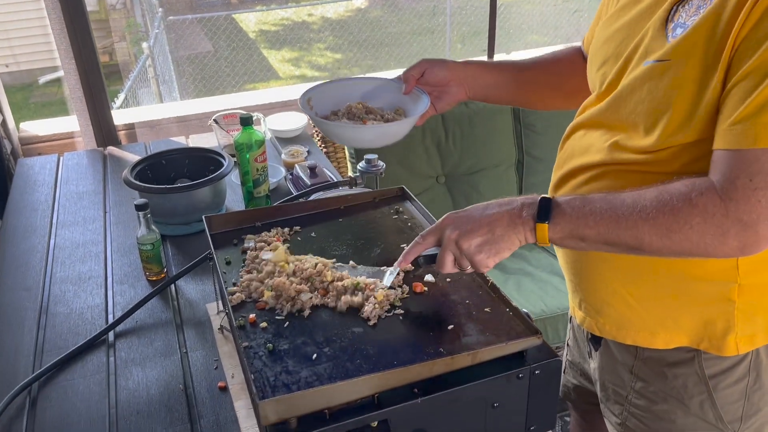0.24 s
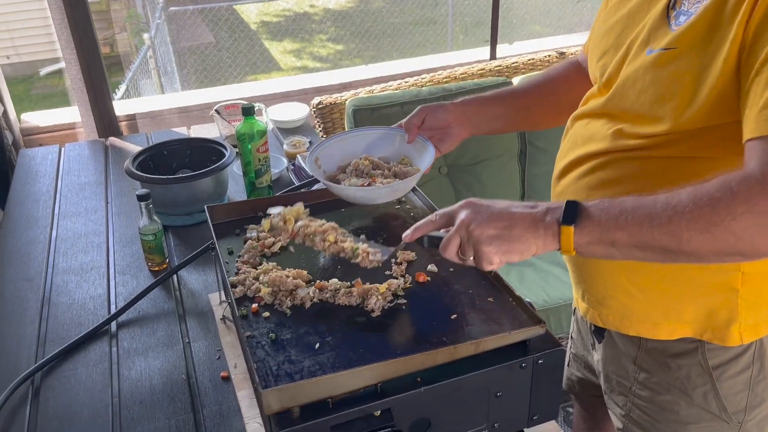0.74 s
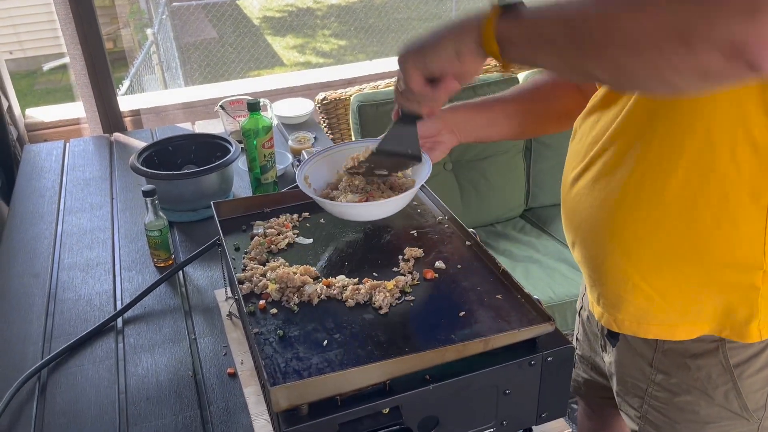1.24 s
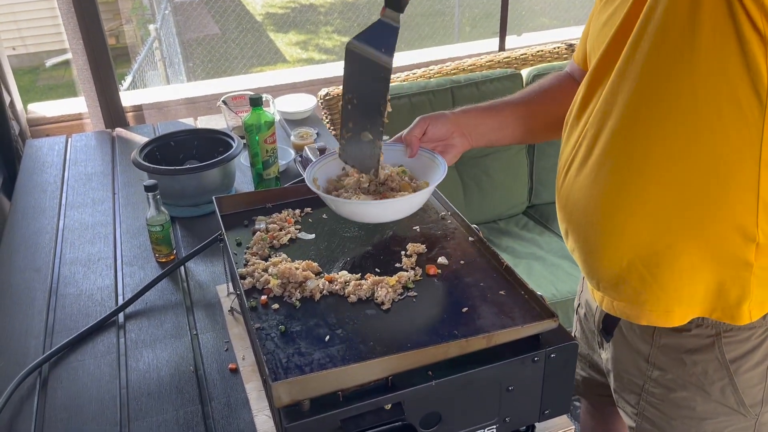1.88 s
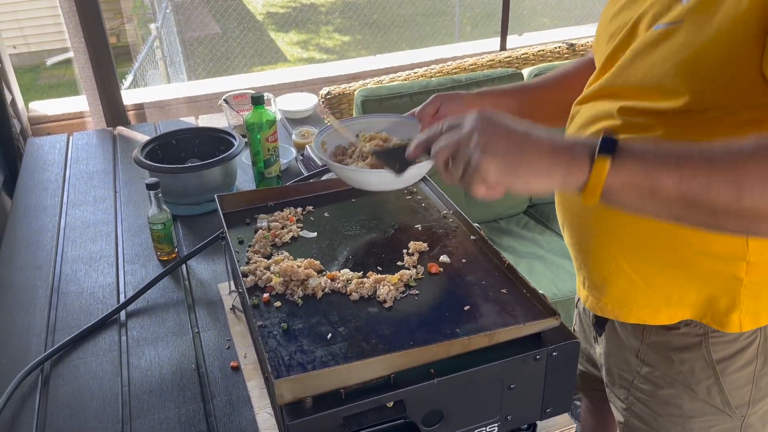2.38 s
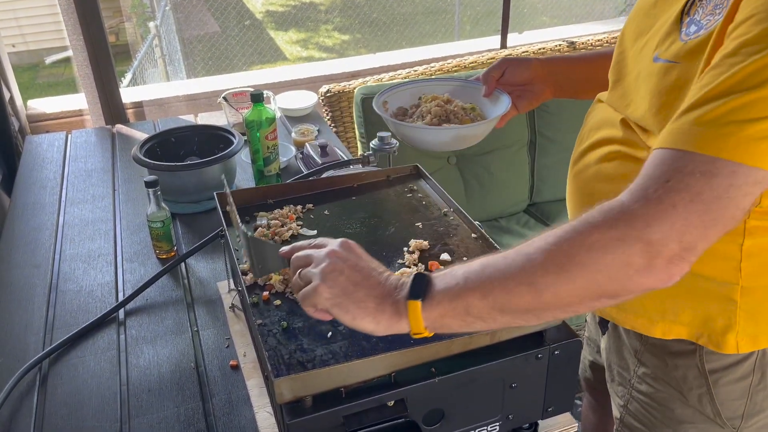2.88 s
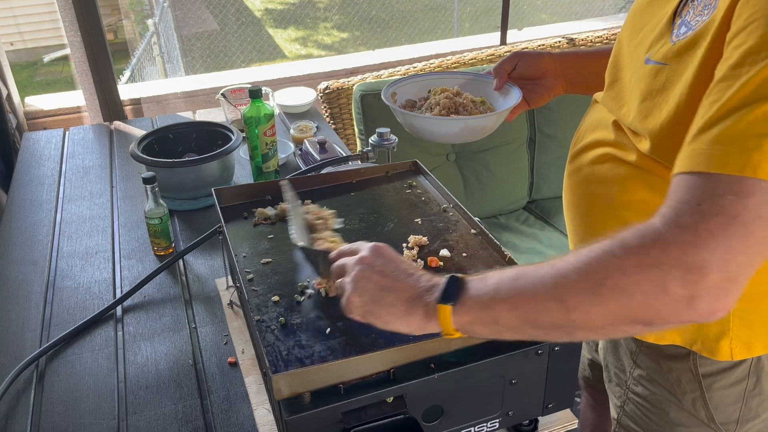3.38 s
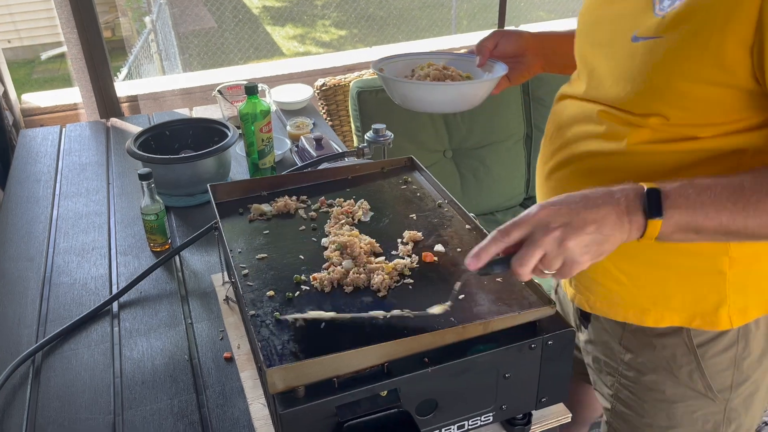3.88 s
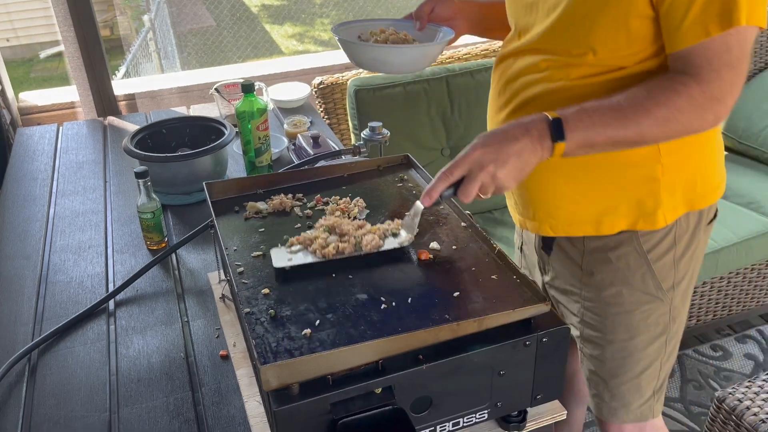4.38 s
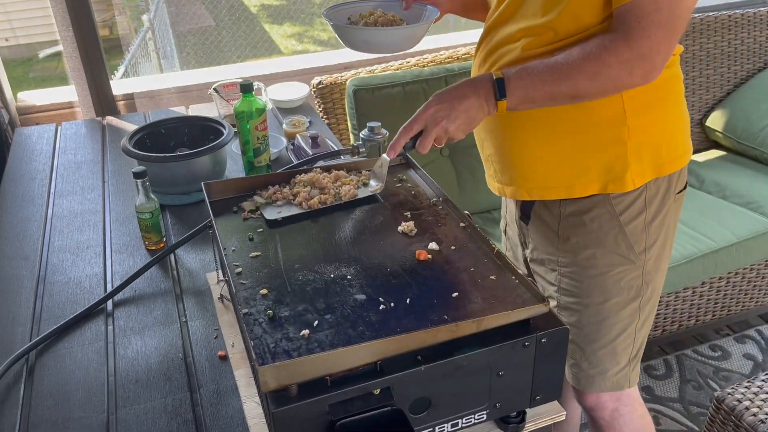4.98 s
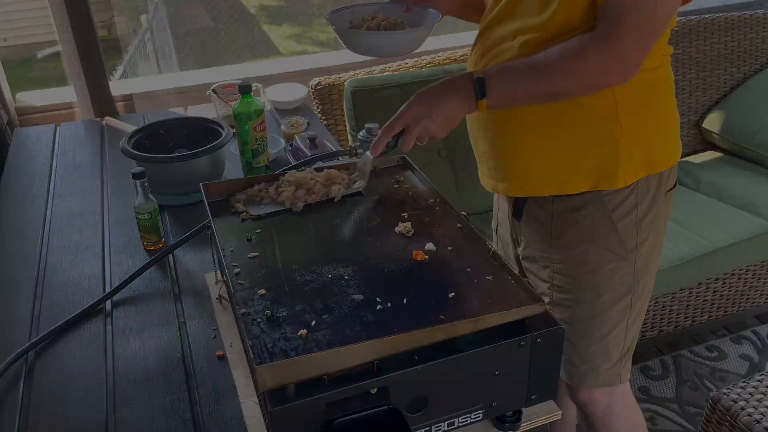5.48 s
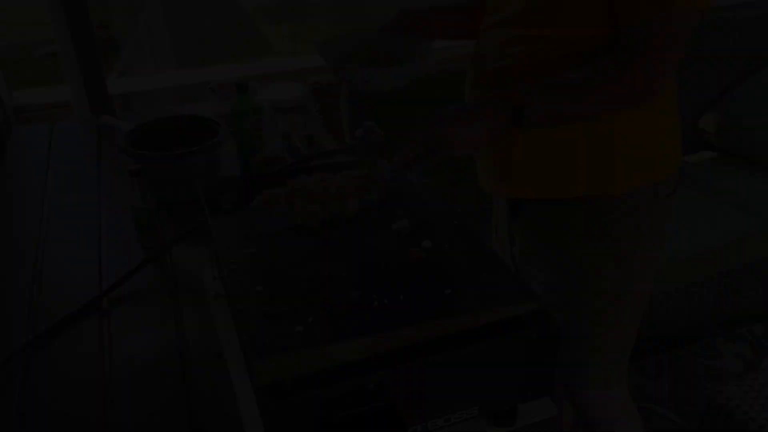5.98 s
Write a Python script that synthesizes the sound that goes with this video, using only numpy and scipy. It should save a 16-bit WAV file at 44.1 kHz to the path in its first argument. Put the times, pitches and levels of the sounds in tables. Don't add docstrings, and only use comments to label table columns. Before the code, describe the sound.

From 0 to 6.2 s a distant small engine drones at a low, slightly wavering pitch under a soft wash of outdoor air, with a very faint ticking insect and a high pulsing cricket. Fine fizz and sparse, tiny crisp pops come from hot rice, slightly clearer around 1.5 and 2.4 s. A faint scrape and rice shove occurs at 0.25 s; thin high bird notes come between 0.3 and 1.6 s. At 3.06 s the spatula hits the griddle hard: a loud, rattling steel clank with a short ring and porch echo. A lighter, brighter clink follows at 3.9 s, then a ringing, hissing scrape at 4.1-4.35 s. Soft rubbing strokes come at 4.4-4.7 s and from 5 s, with a dull rice push at 5.45 s and sharper pops near 5.0 and 5.7 s. Dropping bird whistles sound at 5.65 and 6.0 s as the background fades slightly.

```python
import sys
import numpy as np
from scipy import signal
from scipy.fft import rfft, irfft, next_fast_len
from scipy.io import wavfile
from scipy.ndimage import uniform_filter1d

SR = 44100
rng = np.random.default_rng(int(sys.argv[2]) if len(sys.argv) > 2 else 0)


def unload_audio(sound):
    columns = np.transpose(np.atleast_2d(sound))
    steps = np.round(np.clip(columns, -1, 1) * 32767)
    wavfile.write(sys.argv[1], SR, steps.astype(np.int16))


def gain_from_decibels(decibels):
    exponent = np.asarray(decibels, float) / 20
    return 10 ** exponent


N = 275172
T = np.arange(N) / SR
FADE_DB = -5 * np.maximum(T - 5.36, 0)


def evened(x):
    return x / np.sqrt(np.mean(x ** 2) + 1e-20)


def read(points, hz):
    f, value = np.transpose(points)
    return np.interp(np.log(hz + 1), np.log(f + 1), value)


def coloured(x, points):
    size = x.shape[-1]
    gain = gain_from_decibels(read(points, np.fft.rfftfreq(size, 1 / SR)))
    return irfft(rfft(x) * gain, size)


def add(mix, s, sound):
    part = mix[:, round(s * SR):][:, :sound.shape[-1]]
    part += sound[..., :part.shape[1]]


def resonate(x, hz, width):
    turn = np.exp(2j * np.pi * np.cumsum(hz * np.ones(x.shape[-1])) / SR)
    r = np.exp(-np.pi * width / SR)
    smooth = signal.lfilter([1 - r], [1, -r], x / turn + 1e-18)
    return 2 * (turn * smooth).real


def drift(size, shape):
    return evened(uniform_filter1d(uniform_filter1d(rng.standard_normal(shape), size), size))


def blow(db, rattle, rise, longest, modes, crack):
    t = np.arange(SR // 3) / SR
    clicks = rng.standard_normal((2, len(t))) * gain_from_decibels(2.2 * drift(size=30, shape=len(t)))
    burst = np.exp(-(t / rattle) ** 2) * np.minimum(t / 0.0008, 1)
    late_rattle = 0.21 * np.exp(-t / 0.055) * np.minimum(t / 0.0091, 1)
    body = gain_from_decibels(-18) * (burst + late_rattle) * evened(coloured(clicks, crack))

    f, mode_db, t60 = np.transpose(modes)[:, :, None]
    turn = rng.random((len(modes), 1)) + np.array([0, .75])[:, None, None]
    flutter_db = 1.1 * drift(size=300, shape=(len(modes), len(t)))
    decay_db = -60 * (t - .016) / np.clip(t60, .08, longest)
    heights = gain_from_decibels(mode_db + flutter_db + decay_db) * (1 - np.exp(-t / rise))
    ring = (heights * np.sin(2 * np.pi * (f * t + turn))).sum(1)
    ring = ring / abs(ring).max()
    return gain_from_decibels(db) * (ring + body + gain_from_decibels(-8) * porch(body + .25 * ring))


def blows():
    times = [
        3.0594,
        3.9004,
    ]
    # level/dB, rattle length/s, ring rise/s, longest t60/s
    landings = [
        (-6.5, 0.031, 0.0025, 0.27),
        (-19.5, 0.02, 0.0048, 0.25),
    ]
    # f/Hz, level/dB, t60/s
    plate = [(557, -15, 0.25), (711, -13, 0.4), (845, -4, 0.18), (991, -11, 0.24), (1160, -6, 0.4),
             (1370, -9, 0.32), (1467, -9, 0.15), (1628, -15, 0.16), (1938, -7, 0.2), (2073, -10, 0.4),
             (2202, -13, 0.13), (2280, -10, 0.15), (2355, -14, 0.13), (2484, 0, 0.12), (2597, -7, 0.32),
             (2670, -10, 0.27), (2780, -8, 0.2), (2961, -1, 0.13), (3058, -6, 0.2), (3168, -5, 0.08),
             (3451, -1, 0.19), (3537, -2, 0.12), (3636, -6, 0.1), (3712, -9, 0.12), (3801, -10, 0.37),
             (3876, -11, 0.18), (3973, -6, 0.08), (4121, 0, 0.07), (4535, -1, 0.12), (4737, -11, 0.25),
             (4823, -3, 0.11), (4893, -13, 0.11), (5165, -13, 0.2), (5356, -16, 0.09), (5424, -9, 0.13),
             (5655, -7, 0.13), (5873, -17, 0.07), (6379, -18, 0.09), (6503, -17, 0.16), (7354, -21, 0.12)]
    # f/Hz, level/dB, t60/s
    blade = [(589, -7, 0.08), (778, 0, 0.4), (1144, -8, 0.23), (1332, -8, 0.15), (1502, -10, 0.4),
             (1814, -3, 0.11), (1930, -11, 0.4), (2089, -11, 0.4), (2218, -10, 0.11), (2309, -7, 0.09),
             (2670, -7, 0.13), (2888, -12, 0.14), (3550, -10, 0.07), (3908, -11, 0.07), (4126, -10, 0.21),
             (4221, -11, 0.11), (4538, -6, 0.22), (4756, -7, 0.16), (5168, -14, 0.18), (5636, -14, 0.15),
             (6576, -16, 0.08), (6807, -15, 0.13), (7265, -15, 0.15), (7561, -12, 0.08), (7913, -18, 0.14),
             (7992, -10, 0.14), (8473, -12, 0.12), (8761, -19, 0.16), (8891, -23, 0.09), (9550, -19, 0.1),
             (9709, -18, 0.2), (10094, -15, 0.21), (10565, -18, 0.31), (11181, -23, 0.06),
             (11948, -20, 0.08), (12037, -16, 0.11), (12212, -27, 0.2), (12723, -22, 0.16),
             (13644, -21, 0.07), (14193, -27, 0.13)]
    # f/Hz, level/dB, t60/s
    frame = [(246, -25, .15), (307, -14, .2), (367, -15.5, 0.23), (453, -23, 0.25)]
    # f/Hz, level/dB
    cracks = [
        [(200, -34), (500, -17), (1100, -8), (1800, -8), (3200, 0), (5400, -4), (7000, -10), (9000, -9),
         (10500, -10), (11700, -24), (13500, -19), (15500, -30)],
        [(200, -36), (450, -10), (750, 0), (1900, 0), (2900, -8), (4000, 0), (5400, -3), (7500, -1), (9500, -3),
         (12000, -6), (15500, -12)],
    ]
    out = np.zeros((2, N))
    for s, row, modes, crack in zip(times, landings, (plate + frame, blade + frame), cracks):
        add(out, s, blow(*row, modes, crack))
    return out


def tick(db, top_hz):
    t = np.arange(300) / SR
    snap = rng.standard_normal((2, len(t))) * np.exp(-t / 0.00067)
    lowpass = signal.butter(N=3, Wn=min(top_hz, 16000), fs=SR, output="sos")
    return gain_from_decibels(db) * signal.sosfilt(lowpass, snap)


def ticks():
    # t/s, level/dB, brightest f/Hz
    contacts = [(3.059, -13.5, 7000), (3.0627, -16, 5000), (3.0645, -22, 5000), (3.0689, -14, 5000),
                (3.0738, -16, 4500), (3.082, -14, 4000), (3.8996, -24, 14000), (3.9048, -12, 9000),
                (3.9073, -18, 14000), (3.908, -22, 9000), (3.914, -25, 6000), (3.9224, -17, 4000),
                (4.092, -36, 14000), (4.103, -33, 14000), (5.44, -42, 3000), (5.506, -43, 3500),
                (.257, -45, 3500)]
    out = np.zeros((2, N))
    for s, *row in contacts:
        add(out, s, tick(*row))
    return out


def stroke(t, ring_db, hiss_db, tilt_db, damping, bare=False):
    # early f/Hz, late f/Hz, width/Hz, level/dB, best driven t/s
    flex = [(777, 850, 35, -3, 4.29), (1176, 1160, 33, -1, 4.19), (1697, 1805, 18, 0.5, 4.21),
            (2100, 2256, 50, 1, 4.19), (2320, 2385, 45, -3, 4.29), (2775, 2800, 56, 0, 4.26),
            (2990, 2960, 19, -4, 4.14), (3020, 3052, 49, -6, 4.13), (3203, 4800, 32, -12, 4.4),
            (3440, 3380, 45, -5, 4.25), (3450, 3550, 24, 1.5, 4.25), (3770, 3900, 42, -9, 4.3),
            (4105, 3975, 28, 2.5, 4.18), (4350, 6500, 35, -8, 4.26), (4412, 4400, 32, -13, 4.19),
            (4600, 4535, 37, -5, 4.26), (4920, 4745, 44, -7, 4.3), (5210, 5130, 40, -2.5, 4.27),
            (5320, 5170, 30, -8, 4.24), (5250, 5272, 23, 0, 4.21), (5430, 5380, 35, -16, 4.13),
            (5500, 6400, 47, -7, 4.29), (5820, 5850, 30, -6, 4.6), (6140, 8800, 47, -4, 4.23),
            (6700, 9100, 30, -8, 4.22), (6260, 7400, 50, -4.5, 4.3), (7000, 7200, 23, -19, 4.2),
            (7380, 7362, 68, -7, 4.3)]
    # f/Hz, width/Hz, level/dB
    rub = [(1600, 28, -7), (1930, 87, 0), (2130, 53, 1), (2490, 65, 2), (3390, 26, 1.5), (3906, 80, -7),
           (4409, 77, -6.5), (5030, 44, -5.5), (5297, 29, -5), (5658, 80, -31), (6240, 70, -24),
           (6770, 79, -8), (7670, 70, 1.5)]
    # f/Hz, level/dB
    hiss_colour = [(800, -24), (1500, -13), (5400, -7), (8000, -4), (9300, 3), (10500, -4), (12000, -6),
                   (13800, -2), (15500, -11)]
    # f/Hz, level/dB
    rasp_colour = [(400, -21), (750, -7), (1400, -9), (2200, 1), (5400, -6), (7500, -9), (9000, -35)]
    late = (t - t[0]) / (t[-1] - t[0])
    modes = flex if bare else [(f, f, w, db, None) for f, w, db in rub]
    roughness_db = 1.8 if bare else 2.6
    slips = rng.standard_normal((2, len(t))) * gain_from_decibels(roughness_db * drift(size=120, shape=len(t)))
    ring = 0
    for early_hz, late_hz, w, db, best in modes:
        bend = 1 + 0.004 * drift(size=1200, shape=len(t))
        hz = (early_hz + (late_hz - early_hz) * late) * bend
        loss_db = 55 * abs(t - best) if bare else 0
        tilted_db = db - loss_db + tilt_db * np.log2(early_hz / 3000)
        level_db = tilted_db + 2.7 * drift(size=600, shape=len(t))
        mode = resonate(resonate(slips, hz, w * damping), late_hz, 49.0 * w)
        ring = ring + gain_from_decibels(level_db) * evened(mode)
    rasp = gain_from_decibels(-10) * evened(coloured(slips, rasp_colour))
    hiss = gain_from_decibels(hiss_db + 1.5) * evened(coloured(slips, hiss_colour))
    sound = gain_from_decibels(ring_db + 1.5) * (evened(ring) + rasp) + hiss
    return t[0], sound * signal.windows.tukey(len(t), .05)


def scrape():
    # t/s, level/dB
    pressure = [
        (4.087, -52),
        (4.094, -39),
        (4.103, -38.5),
        (4.195, -32),
        (4.227, -35.5),
        (4.291, -33.5),
        (4.313, -37),
        (4.35, -56),
        (4.4, -54),
    ]
    s, pressure_db = np.transpose(pressure)
    t = np.arange(s[0], s[-1], 1 / SR)
    ring_db = np.interp(t, s, pressure_db) - 2.1
    fastest_s, hiss_loss_db_per_s = 4.185, 44
    hiss_db = ring_db + 5.5 - hiss_loss_db_per_s * abs(t - fastest_s)
    return stroke(t, ring_db, hiss_db, tilt_db=1.75, damping=0.83, bare=True)


def nudge(s, rise, fall, ring_db, hiss_db):
    t = np.arange(s - rise, s + fall, 1 / SR)
    slack = np.where(t < s, (s - t) / rise, (t - s) / fall)
    firm_tilt_db, edge_tilt_db, edge_db = 1.5, 2.5, -13.5
    tilt_db = firm_tilt_db + (edge_tilt_db - firm_tilt_db) * slack
    free_db = -30
    damping = np.clip(gain_from_decibels(0.69 * (free_db - ring_db)), 1, 10)
    return stroke(t, ring_db + edge_db * slack, hiss_db + edge_db * slack, tilt_db, damping)


def heap(s, length, thud_db, patter_db):
    t = np.arange(0, length, 1 / SR)
    lumps = rng.standard_normal((2, len(t))) * gain_from_decibels(2.0 * drift(size=200, shape=len(t)))
    thud = evened(resonate(lumps, 614, 130) + .5 * resonate(lumps, 940, 190))
    patter = evened(resonate(lumps, 1870, 500) + 0.22 * resonate(lumps, 3000, 400))
    shape = np.minimum(t / 0.0024, 1) * gain_from_decibels(-18 * (t / length) ** 4.4)
    return s, shape * (gain_from_decibels(thud_db) * thud + gain_from_decibels(patter_db - 11.0) * patter)


def rubs():
    # firmest t/s, rise/s, fall/s, ringing level/dB, hiss level/dB
    strokes = [(0.225, 0.03, 0.023, -60, -55.5), (3.165, .006, 0.037, -66, -75),
               (3.369, 0.35, 0.06, -76, -65), (4.44, 0.062, 0.086, -56, -56.5),
               (4.505, 0.052, 0.076, -48.5, -50.5), (4.69, 0.057, .03, -66, -62),
               (4.956, 0.22, 0.12, -63, -63), (5.05, 0.17, 0.083, -90, -65), (5.23, 0.13, 0.1, -61, -63.5),
               (5.445, 0.0072, 0.16, -61.5, -69), (5.54, .1, 0.13, -74, -60),
               (5.718, 0.16, 0.064, -87, -59)]
    # start t/s, length/s, thud level/dB, patter level/dB
    heaps = [
        (0.252, .045, -53, -44.5),
        (5.44, 0.17, -52, -55),
        (5.436, 0.024, -66, -43),
        (5.499, 0.061, -62, -46),
    ]
    out = np.zeros((2, N))
    add(out, *scrape())
    for row in strokes:
        add(out, *nudge(*row))
    for row in heaps:
        add(out, *heap(*row))
    return out


def pop(db, hz):
    t = np.arange(900) / SR
    turn = np.array([[0], [np.pi / 2]])
    burst = np.sin(2 * np.pi * hz * t + turn) * np.exp(-t / .00009) * np.minimum(t * SR / 3, 1)
    thump = 0.29 * np.sin(2 * np.pi * 4500 * t) * np.exp(-t / 0.0001)
    spit = 0.059 * np.diff(rng.standard_normal((2, len(t) + 1))) * np.exp(-t / 0.0042)
    return gain_from_decibels(db + 26.5) * (burst + thump + spit)


def rice_pops():
    # t/s, peak level/dB, f/Hz
    grains = [(0.0184, -53.5, 12100), (0.5541, -62, 9690), (0.5658, -58, 11900), (0.7767, -59, 11000),
              (0.8764, -59, 9290), (1.2006, -60, 11200), (1.53, -53, 9300), (1.5378, -53, 12100),
              (1.574, -59, 11500), (1.6402, -61, 11740), (2.2025, -54.5, 12900), (2.239, -57, 11690),
              (2.359, -49.5, 11500), (2.4087, -53, 12900), (2.9647, -62, 10000), (3.2207, -60, 12900),
              (3.2905, -60, 11900), (5.0173, -46.5, 11900), (5.0453, -50, 12000), (5.233, -53.5, 12400),
              (5.3445, -59, 10600), (5.38, -59, 11600), (5.47, -53, 11200), (5.706, -53, 11400),
              (5.719, -47, 11400), (5.7482, -54, 12000), (.7183, -60, 11440), (6.009, -53, 11600),
              (6.121, -60, 10700), (6.1402, -61, 9670), (.0952, -68, 11400), (.2024, -64, 10900),
              (.4279, -61, 10900), (.4928, -62, 11500), (.5896, -60, 9750), (1.4701, -69, 12000),
              (1.6931, -64, 12500), (1.707, -64, 12100), (2.031, -60, 13200), (2.0742, -61, 11800),
              (2.1331, -61, 13100), (2.251, -62, 12000), (3.2106, -65, 12500), (3.235, -57, 11600),
              (4.8264, -70, 12600), (4.8614, -64, 9610), (4.9257, -62, 12200), (5.45, -60, 12200),
              (5.8331, -62, 11100), (5.8623, -63, 11800), (5.8855, -65, 12300)]
    delay_s = 0.0019
    out = np.zeros((2, N))
    for s, *row in grains:
        add(out, s + delay_s, pop(*row))
    return out


def fizz():
    size = gain_from_decibels(3.5 * np.minimum(rng.exponential(1, N), 4)) * (rng.random(N) < 30 / SR)
    return gain_from_decibels(-81) * evened(signal.oaconvolve(size[None], pop(0, 9200), axes=1)[:, :N])


def porch(x):
    # f/Hz, t60/s
    decay = [(300, 0.56), (1000, 0.3), (3000, 0.14), (6000, 0.086), (12000, 0.064)]
    taps = np.zeros((2, SR // 2))
    at = np.arange(200, SR // 2 - 20, 20) + rng.integers(0, 20, (2, (SR // 2 - 201) // 20))
    np.put_along_axis(taps, at, rng.choice([-1., 1.], at.shape), 1)
    hz, t, z = signal.stft(taps, SR, nperseg=256)
    tail = signal.istft(z * gain_from_decibels(-60 * t / read(decay, hz)[:, None]), SR, nperseg=256)[1]
    return signal.fftconvolve(x, tail / np.linalg.norm(tail[0]), axes=1)[:, :x.shape[1]]


def engine():
    # t/s, fourth order f/Hz, fourth order level/dB
    speed = [(0, 97.5, -40.5), (.25, 96.8, -37.5), (.62, 100.3, -40.5), (1.55, 100.3, -40.5),
             (1.8, 96.6, -41), (2.15, 96.8, -41), (2.38, 99.7, -42), (3.0, 99.6, -39), (3.3, 98, -38),
             (3.95, 96.8, -38.5), (4.36, 99.6, -41), (4.45, 100.4, -46.5), (4.7, 100.2, -47.5),
             (5.25, 99, -37.5), (5.8, 97.4, -39), (5.92, 95.5, -45.5), (6.03, 93.8, -37.5),
             (6.24, 93.2, -40)]
    # multiple, level/dB
    orders = [(1, -67), (2, -14.5), (3, -12), (4, 1.5), (5, -10.5), (6, -7), (7, -12), (8, -11), (9, -21.5),
              (10, -17), (11, -15), (12, -16), (13, -25.5), (14, -71), (15, -30), (16, -24.5)]
    s, fourth_hz, fourth_db = np.transpose(speed)
    unsteady = 1 + 0.003 * drift(size=2000, shape=N)
    turns = np.cumsum(np.interp(T, s, fourth_hz / 4) * unsteady) / SR
    others_db = -42 + FADE_DB + 0.64 * drift(size=30000, shape=N)
    paths = np.array([[0], [np.pi / 2]])
    out = 0
    for k, db in orders:
        waver = drift(size=3 if k < 4 else 30, shape=600)
        waver = np.interp(T, np.linspace(0, T[-1], 600), waver)
        waver_db = (5.0 if k < 4 else 2.4) * waver
        level_db = np.interp(T, s, fourth_db) if k == 4 else others_db + waver_db
        out = out + gain_from_decibels(db + level_db + 1.0) * np.cos(2 * np.pi * (k * turns + rng.random()) + paths)
    return out, turns


def air(turns):
    # f/Hz, level/dB per Hz
    wash_colour = [(25, -69), (45, -5.5), (70, 7.5), (110, -7), (200, -4), (330, -11), (600, -15),
                   (1200, -18.5), (2000, -24.5), (2700, -23), (3500, -26.5), (5400, -31), (7500, -31.5),
                   (9300, -34.5), (11000, -38), (15500, -41)]
    frames, hz = N // 256 + 5, np.fft.rfftfreq(1024, 1 / SR)
    a, b, patches = rng.standard_normal((3, 2, frames, 513)).transpose(0, 1, 3, 2)
    patches = evened(uniform_filter1d(uniform_filter1d(patches[0], 10, 0), 10, 1))
    z = (a + 1j * b) * gain_from_decibels(read(wash_colour, hz)[:, None] + patches)
    wash = evened(signal.istft(z, nperseg=1024, noverlap=768)[1][:, :N])
    lull_db = -0.44 * np.clip((T - 1.62) / 0.12, 0, 1)
    swell = 0.91 * FADE_DB + lull_db
    throb = 1 + 0.041 * np.cos(2 * np.pi * turns)
    return gain_from_decibels(-49 + swell - swell.mean()) * throb * wash


def insect():
    beat = np.diff(np.floor(np.cumsum(23 * (1 + 0.038 * drift(size=9000, shape=N))) / SR), prepend=0)
    buzz = signal.oaconvolve(beat, np.hanning(500))[:N] * rng.standard_normal((2, N))
    swing_db = 2 * np.cos(2 * np.pi * T / 3.1)
    return gain_from_decibels(-77.5 + swing_db) * evened(resonate(resonate(buzz, 5160, 350), 5160, 350))


def cricket():
    gate = np.clip(np.cos(2 * np.pi * (T - .42) / 0.32) - .55, 0, 1)
    buzz = resonate(resonate(rng.standard_normal((2, N)), 9040, 260), 9040, 260)
    level_db = -74 + 3 * np.clip((T - 3.6) / 0.49, 0, 1)
    return gain_from_decibels(level_db) * evened(gate * buzz)


def bird():
    # t/s, start f/Hz, end f/Hz, length/s, level/dB
    whistles = [
        (5.625, 3150, 3000, 0.022, -63),
        (5.642, 3050, 2520, 0.046, -56),
        (5.689, 2550, 2500, 0.044, -72),
        (6.009, 2950, 2570, 0.048, -55.5),
        (6.049, 2600, 2650, 0.077, -65),
        (.28, 3960, 3900, 0.088, -61.5),
        (.96, 3930, 3880, 0.06, -61),
        (1.31, 4000, 3900, 0.064, -64),
        (1.44, 4000, 3950, 0.045, -65),
        (1.58, 3770, 3920, 0.038, -64),
    ]
    out = np.zeros((2, N))
    for s, start_hz, end_hz, length, db in whistles:
        hz = np.linspace(start_hz, end_hz, int(length * SR))
        hz = hz + 90 * drift(size=100, shape=len(hz))
        whistle = np.hanning(len(hz)) * np.sin(2 * np.pi * np.cumsum(hz) / SR)
        add(out, s, gain_from_decibels(db + 4.0) * whistle * [[1], [0]])
    return out


def ports(x, column, most=1):
    # f/Hz, left lead/rad, left-right level/dB, far likeness, near likeness
    pair = [(0, 0, -.8, .96, .98), (100, .1, -.9, .988, .99), (170, .2, -1, .93, .96),
            (300, .35, -1.5, .87, .92), (700, .8, -.2, .5, .85), (1300, 1, .2, .22, .7),
            (2000, .5, 2.2, .55, .75), (3600, .8, 1.2, .4, .77), (5200, .4, 4, .5, .68),
            (6300, -1.2, 1, .5, .7), (7200, -2.2, 0, .55, .75), (7700, -np.pi, 0, 1, 1),
            (8800, -np.pi, 0, 1, 1), (9700, -4.5, 0, .55, .75), (10750, -2 * np.pi, 0, 1, 1),
            (12400, -2 * np.pi, 0, 1, 1), (13900, -7.6, 0, .5, .75), (14700, -3 * np.pi, 0, 1, 1)]
    size = next_fast_len(N)
    hz = np.fft.rfftfreq(size, 1 / SR)
    f, lead, tilt_db = np.transpose(pair)[:3]
    same = np.clip(np.interp(hz, f, np.transpose(pair)[column]), 0, min(most, 1))
    half = gain_from_decibels(np.interp(hz, f, tilt_db) / 2) * np.exp(.5j * np.interp(hz, f, lead))
    a, b = rfft(x, size)
    left = a * half
    right = (same * a + np.sqrt(1 - same ** 2) * b) / half
    return irfft(np.array([left, right]), size)[:, :N]


def scene():
    sliding = rubs()
    near = blows() + sliding + gain_from_decibels(-8.5) * porch(sliding) + fizz()
    snaps = rice_pops() + ticks()
    hum, turns = engine()
    far = hum + air(turns) + insect() + bird() + cricket()
    return ports(far, column=3) + ports(near, column=4) + ports(snaps, column=4, most=.8)


def top_cut(x):
    return signal.sosfilt(signal.butter(12, 15710, fs=SR, output="sos"), x)


def record(dry):
    highpass = signal.butter(N=2, Wn=38, btype="high", fs=SR, output="sos")
    return top_cut(signal.sosfilt(highpass, dry))


dry = scene()
out = record(dry)
unload_audio(out)
```